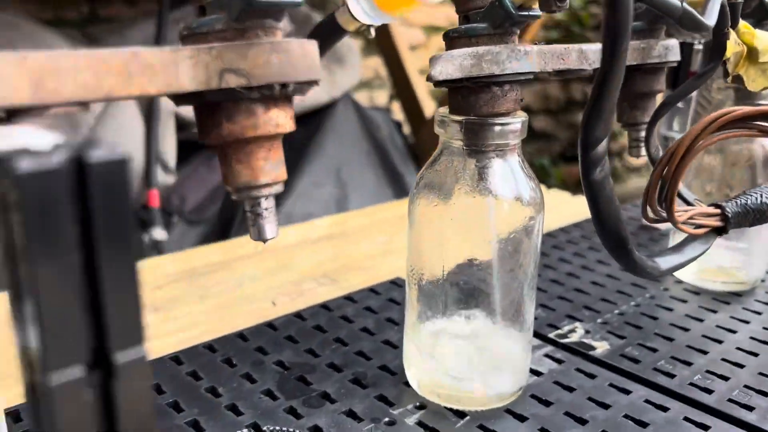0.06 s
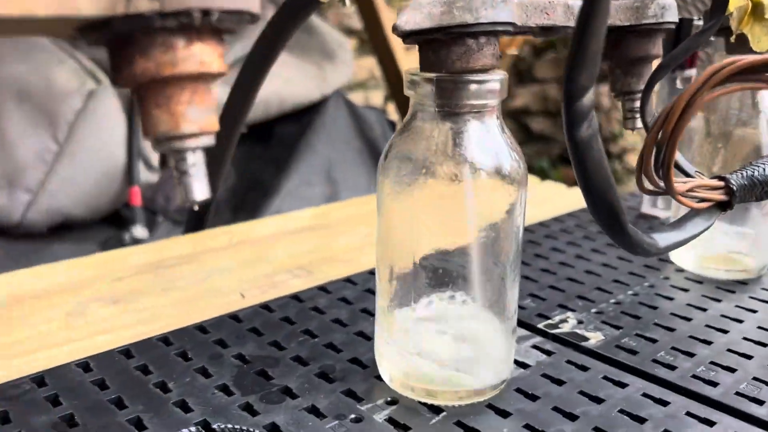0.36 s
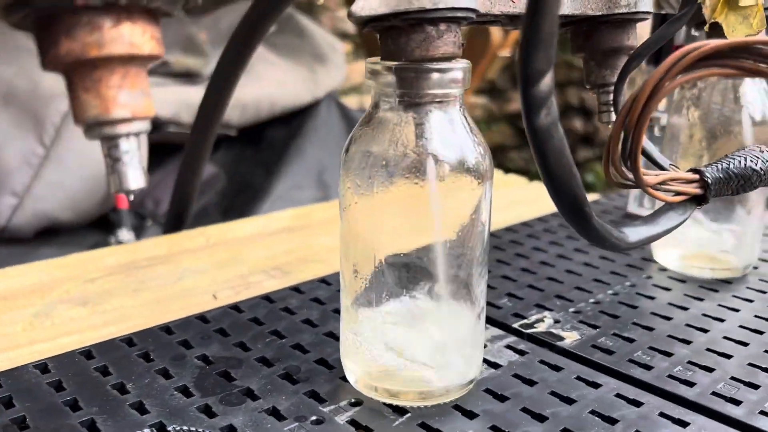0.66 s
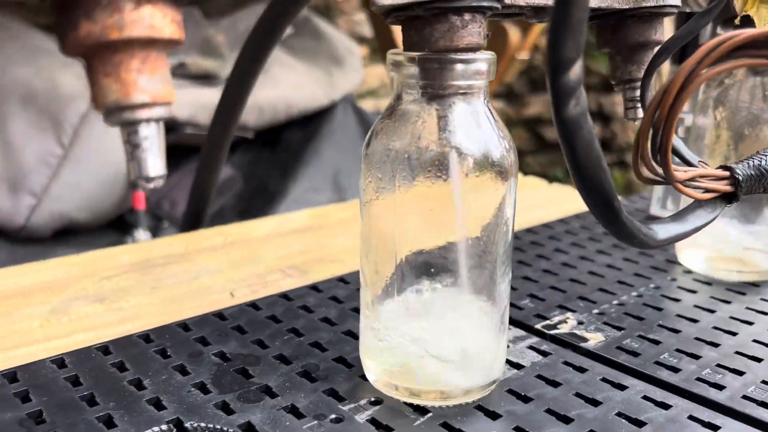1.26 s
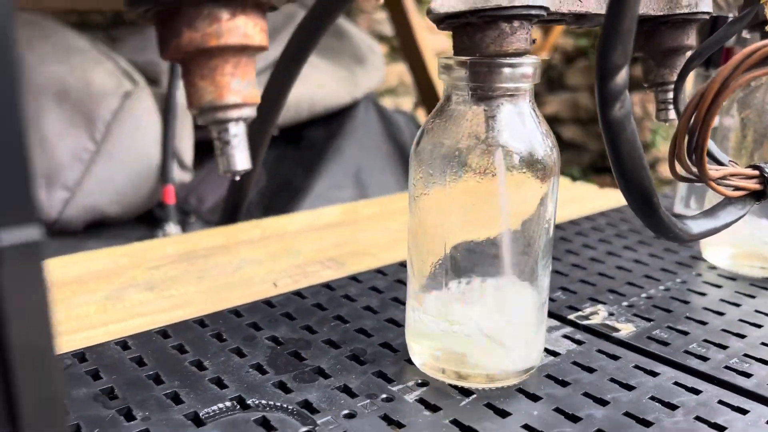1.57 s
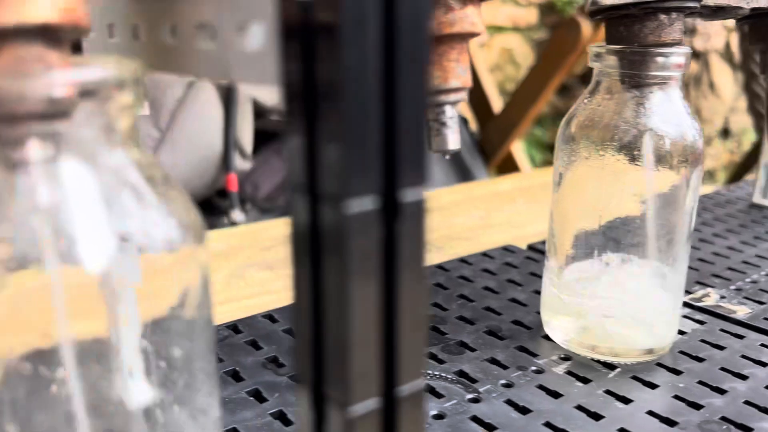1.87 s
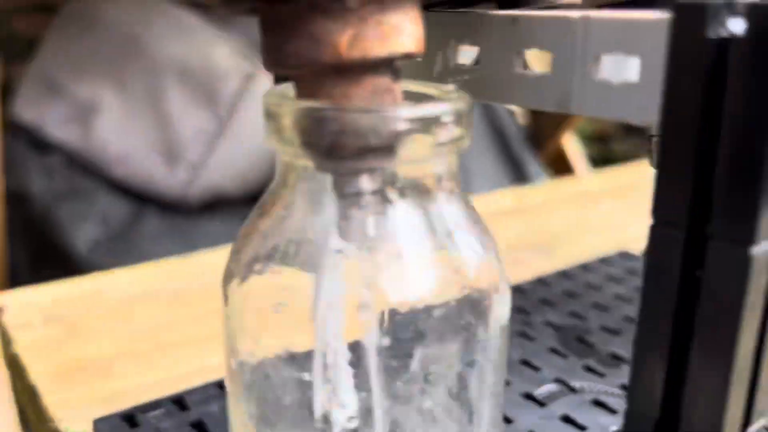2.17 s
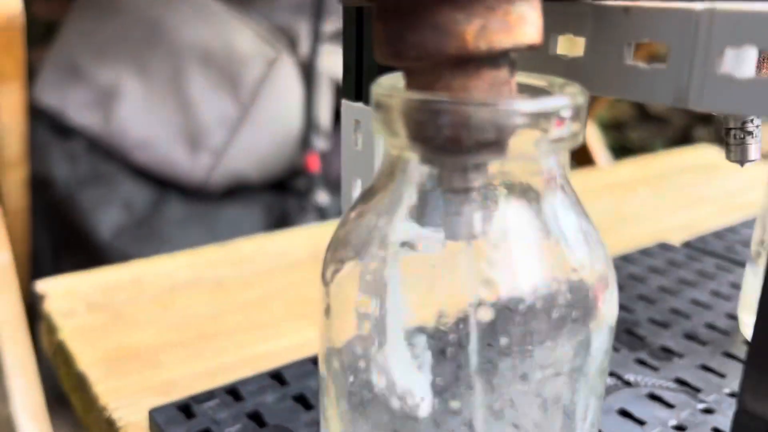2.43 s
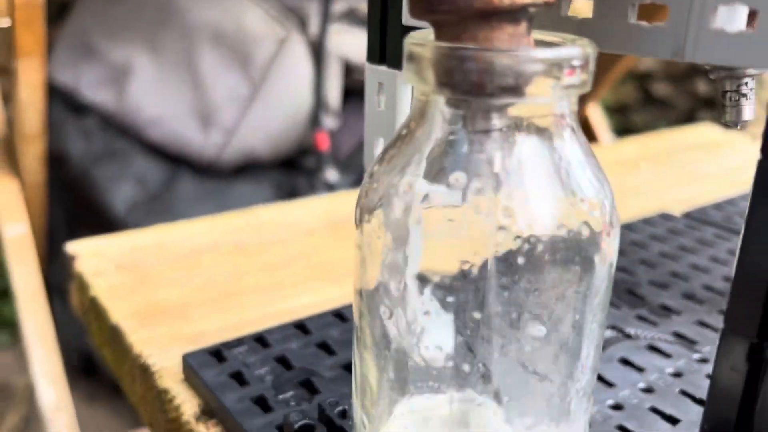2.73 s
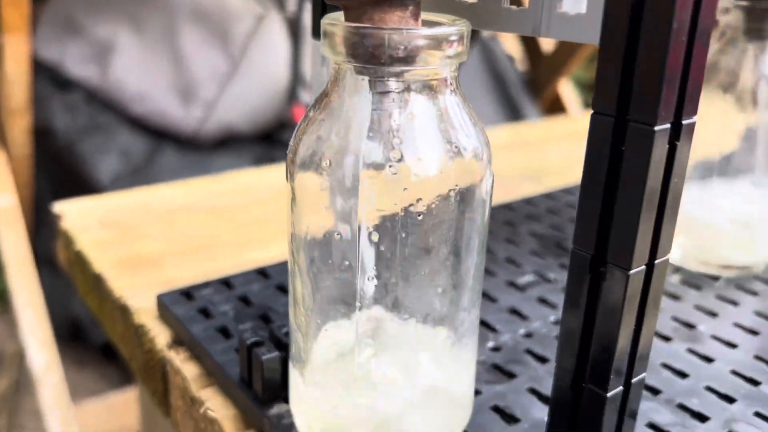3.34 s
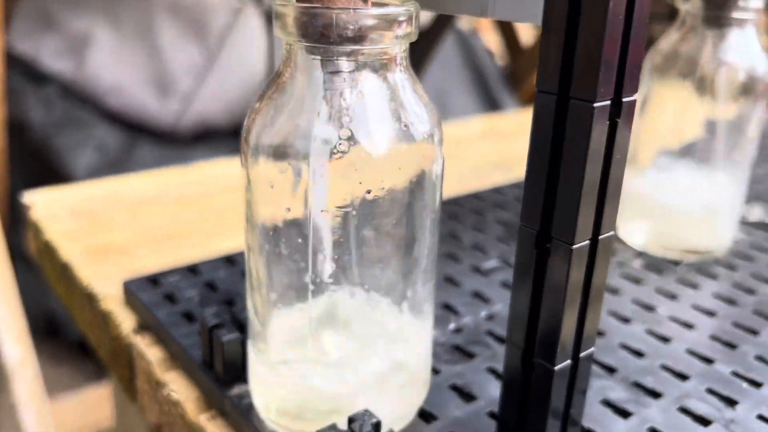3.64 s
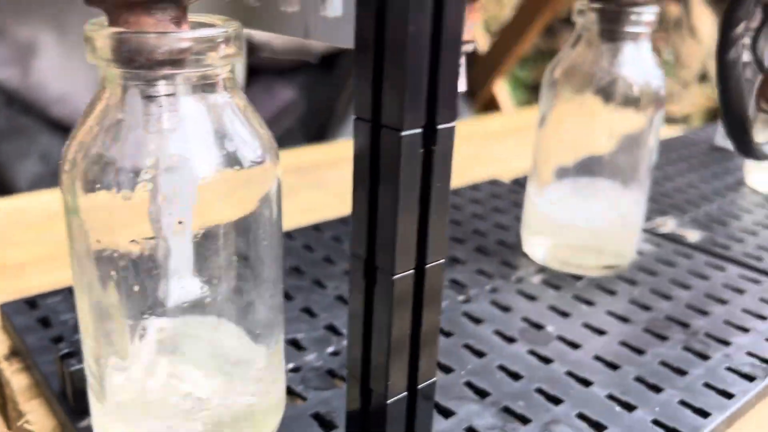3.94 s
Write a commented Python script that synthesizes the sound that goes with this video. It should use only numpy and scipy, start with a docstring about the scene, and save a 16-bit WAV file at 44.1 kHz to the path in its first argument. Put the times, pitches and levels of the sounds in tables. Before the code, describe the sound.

A fast ticking buzz of fuel injectors spraying into glass bottles cuts off suddenly.

```python
"""At an outdoor test bench, fuel injectors pulsed a hundred times a second spray into glass bottles.
In every cycle the valves click open and shut, their impacts drive the frame into a harmonic buzz,
and the fuel hisses; now and then the pump catches with a clank. The microphone moves from one bottle
to the next, where drops set the glass ringing. After a soft bump the drive is switched off,
leaving quiet air and a little wind."""
import sys
import numpy as np
from scipy import signal
from scipy.fft import rfft, irfft, next_fast_len
from scipy.io import wavfile
from scipy.ndimage import map_coordinates

SR = 44100
rng = np.random.default_rng(int(sys.argv[2]) if len(sys.argv) > 2 else 0)


def digitize_waveform(pressure):
    """Quantize a signal to 16-bit integers and store it at the path in sys.argv[1].

    Rows of a 2-D input are taken as channels; values are limited to [-1, 1].
    """
    field = np.atleast_2d(pressure).T
    bounded = np.clip(field, -1, 1)
    quanta = np.round(bounded * 32767).astype(np.int16)
    wavfile.write(sys.argv[1], SR, quanta)


N = 176400
T = np.arange(N) / SR
PULSE_HZ, OFF_S = 99.9, 3.868
PERIOD_MS = 1000 / PULSE_HZ

# Valve contacts. Each row: time into the cycle in ms, relative push on the frame in dB,
# relative tick level in dB, decay time constant in ms.
CONTACTS = [(9.5, -15, -2, 0.81), (0.898, -1.5, -12, 0.88), (3.3, -1, -6, 0.84), (4.1, -0.5, -2.5, 0.92)]

def valve_ticks(jitter_s=6e-6, spread_db=0.5, ring_samples=256):
    """Impact excitation: each contact rings briefly, its timbre changing as the microphone drifts."""
    cycle_starts = np.arange(int(N / SR * PULSE_HZ)) / PULSE_HZ
    out = 0
    for at_ms, _, tick_db, decay_ms in CONTACTS:
        times = cycle_starts + at_ms / 1000 + jitter_s * rng.standard_normal(len(cycle_starts))
        strengths = from_db(tick_db + spread_db * rng.standard_normal(len(times)))
        hits = clicks(times, strengths * (times < OFF_S))
        decay = np.exp(-T[:ring_samples] * 1000 / decay_ms)
        responses = rng.standard_normal((2, ring_samples)) * decay
        one, other = (signal.oaconvolve(hits, response)[:N] for response in responses)
        blend_rad = 1.17 * T + 0.23 * drift(2.476)
        out = out + np.cos(blend_rad) * one + np.sin(blend_rad) * other
    return out


def puffs(strengths_db, decay_scale, leak_db, spread_db=0):
    """Incoherent sources add in power: a decaying burst of noise at each contact, over a steady leak."""
    power = from_db(leak_db) ** 2
    for db, (at_ms, _, _, decay_ms) in zip(strengths_db, CONTACTS):
        since_ms = (T * 1000 - at_ms) % PERIOD_MS
        power = power + (from_db(db) * np.exp(-since_ms / (decay_ms * decay_scale))) ** 2
    noise = rng.standard_normal(N) * np.sqrt(power) * running()
    cycle = (T * PULSE_HZ).astype(int)
    cycle_gains = from_db(spread_db * np.clip(rng.standard_normal(cycle[-1] + 1), -2, 2))
    return noise * rms_one(cycle_gains[cycle])


# The rig's loudness at the microphone. Each row: time in seconds, then the relative levels in dB
# of the frame's hum, the frame's rasp and the treble of ticks and spray.
RIG_LEVELS = [(0.0, -43, -28, -29), (0.02, -41, -32, -29.5), (0.2, -42, -32, -29),
              (0.225, -42.5, -28, -30.5), (0.29, -42.5, -26.5, -30.5), (0.33, -41, -29.5, -29.5),
              (0.55, -41.5, -30, -28), (0.68, -40.5, -26.5, -29), (0.9, -40.5, -29, -29),
              (1.35, -41, -29.5, -28.5), (1.7, -41, -32.5, -29), (1.86, -41.5, -29, -29.5),
              (2.28, -43.5, -33.5, -30.5), (3.01, -43, -36.5, -33), (3.11, -43.5, -36, -33),
              (3.68, -43, -37.5, -34), (3.7, -44, -36.5, -33.5)]
# Ticks and spray beside each bottle. Each row: frequency in Hz, relative spectral density in dB.
TREBLE_FIRST = [(3240, -19), (4500, -13.5), (5400, -6.5), (6080, -8.5), (6640, -5), (7090, -4.5),
                (7450, -3), (8060, -5.5), (8610, -8), (9600, -9.5), (10100, -12), (11300, -10.5),
                (12500, -6.5), (13500, -6), (14500, -3.5), (15700, -3.5)]
TREBLE_SECOND = [(3240, -15.5), (5500, -11), (6300, -7), (6940, 0), (7540, -8), (7990, -1), (9480, -8),
                 (11000, -5.5), (11800, -9.5), (13300, -7), (14100, -10), (14500, -1), (15700, -9)]

def ticks_and_spray():
    """Source and filter: valve ticks and fuel hiss take their colour from the microphone's position."""
    ticks = rms_one(valve_ticks())
    spray = rms_one(puffs([tick_db for _, _, tick_db, _ in CONTACTS], decay_scale=1.2, leak_db=-10))
    source = with_bench_echo(from_db(-2.5) * ticks + from_db(-4) * spray)
    _, _, treble_db = in_time(RIG_LEVELS)
    second = second_bottle_share()
    treble = (1 - second) * colour(source, TREBLE_FIRST) + second * colour(source, TREBLE_SECOND)
    return from_db(treble_db - 1) * treble + sheen(source) + (1 - second) * nozzle_ring(source)


# The bench reflection as the microphone moves. Each row: time in seconds, delay in ms.
BENCH_ECHO = [(0, 0.8), (.4, 0.79), (1.0, 0.69), (1.55, 0.62), (1.9, 0.78), (2.15, 1.024), (2.7, 1.14),
              (4, 1.2)]

def with_bench_echo(direct, echo_db=-12.5):
    """Comb filtering: a reflection with a changing delay interferes with the direct sound."""
    delay_s = in_time(BENCH_ECHO)[0] / 1000
    return direct + from_db(echo_db) * map_coordinates(direct, [(T - delay_s) * SR], order=3)


# A bright resonance. Each row: time in seconds, centre frequency in Hz, level in dB.
SHEEN = [(0, 9200, -44), (.4, 8600, -45.5), (.9, 9000, -42.5), (1.6, 8600, -40.5), (1.7, 8650, -44),
         (1.82, 8040, -37.5), (2.02, 7630, -39.5), (2.2, 7430, -46), (3.84, 7000, -41)]

def sheen(source, pole_width_hz=800):
    """Band-pass resonance: a bright peak sinks in frequency as the microphone passes."""
    hz, db = in_time(SHEEN)
    carrier = np.exp(2j * np.pi * np.cumsum(hz) / SR)
    radius = np.exp(-np.pi * pole_width_hz / SR)
    baseband = signal.lfilter([1], [1, -2 * radius, radius ** 2], source / carrier)
    return from_db(db) * rms_one((baseband * carrier).real)


# A metal part by the first bottle. Each row: frequency in Hz, level in dB, 60 dB decay time in seconds.
NOZZLE_MODES = [(5390, -44, 0.023)]

def nozzle_ring(source):
    """Forced resonance: the ticks and spray keep one metal part ringing."""
    return sum(from_db(db) * rms_one(ring(source, [(hz, 0, t60)])) for hz, db, t60 in NOZZLE_MODES)


# The frame's spectrum beside each bottle. Each row: harmonic number, relative level in its band in dB.
FRAME_FIRST = [(1, -23.5), (2, -10.5), (3, -11), (4, -17.0), (5, -3.5), (6, -5.5), (7, -13.5), (8, -20.5),
               (9, -13), (10, -3), (11, -7), (12, -4.5), (13, 0.5), (14, 2), (15, 2), (16, -19.5), (17, 2),
               (18, 3), (19, -2), (20, -7), (21, -4.5), (22, -3), (23, -4), (24, -2), (25, -17.5),
               (26, -8.5), (27, -7.5), (28, -4.5), (29, 1.5), (30, -7), (31, -7), (32, -5.5), (33, -7.0),
               (34, -6), (35, -2.5), (36, -2), (37, -11.5), (38, -0.5), (39, -6.5), (40, -10), (41, 1),
               (42, -3.5), (43, -4.5), (44, -11.5), (45, -4.5), (46, -6), (47, -7), (48, -9.5), (49, -10),
               (50, -6.5), (51, -9), (52, -3), (53, -9.5), (54, 2), (55, -13.5)]
FRAME_SECOND = [(1, -22), (2, -12.5), (3, -8.5), (4, -15.5), (5, -7.5), (6, -15), (7, -11), (8, -25),
                (9, -12.5), (10, -2.5), (11, -8), (12, -6), (13, -4), (14, -4), (15, 2), (16, -24),
                (17, -7), (18, -7), (19, -9), (20, -10), (21, -11.5), (22, -2.5), (23, -5.5), (24, -3.5),
                (25, -8.5), (26, -17.5), (27, -8.5), (28, -11.5), (29, -10.0), (30, -13), (31, -5.5),
                (32, -11), (33, -14), (34, -7.5), (35, -11.0), (36, -6.5), (37, -13.5), (38, -6.5),
                (39, -6.5), (40, -12), (41, -5), (42, -11.0), (43, -5.5), (44, -13.5), (45, -20),
                (46, -9.5), (47, -19), (48, -8), (49, -7), (50, -11.5), (51, -20), (52, -4.5), (53, -8),
                (54, -11), (55, -10.5)]
# The buzz band, between hum and rasp. Each row: time in seconds, relative level in dB.
BUZZ_LEVEL = [(0.0, -32.5), (0.21, -31.5), (0.22, -30), (0.32, -32), (1.45, -30.5), (1.49, -33),
              (1.57, -31), (1.71, -31.5), (1.79, -32.5), (2.05, -32.5), (2.45, -35), (2.46, -37.5),
              (2.57, -34.5), (2.93, -35), (2.95, -37), (3.25, -34), (3.41, -35.5), (3.84, -34)]
# Harmonics that meet a resonance, by harmonic number. Each row: time in seconds, relative level in dB.
RESONANT_HARMONICS = { 12: [(0, -47), (1.0, -44.5), (2.4, -45), (2.55, -48), (2.68, -40.5), (2.95, -45),
                      (3.85, -44.5)], 13: [(0, -43.5), (.45, -39.5), (1.0, -38.5), (1.7, -42.5), (1.8, -47),
                      (2.4, -47.5), (2.75, -43), (3.3, -48)], 14: [(0.02, -42.5), (0.1, -36.5),
                      (0.14, -61.0), (0.23, -44.5), (0.28, -55.0), (0.53, -48), (0.76, -39), (0.79, -58.5),
                      (0.86, -41), (1.44, -40.5), (1.7, -42), (1.74, -50.0), (1.97, -46), (2.48, -66),
                      (2.93, -47), (2.96, -58), (3.08, -51.5), (3.85, -47)], 15: [(0.02, -40), (0.2, -51.5),
                      (0.23, -41.0), (0.47, -67), (0.8, -46.0), (0.85, -59.5), (1.08, -39), (1.11, -52),
                      (1.17, -44), (1.3, -41), (1.46, -38.0), (1.49, -63), (1.52, -45), (1.69, -36.0),
                      (1.78, -61.0), (1.88, -38), (1.93, -48.5), (2.0, -40.5), (2.42, -40), (2.49, -57),
                      (2.53, -38), (2.57, -57), (2.79, -41), (2.81, -56.5), (2.92, -41), (3.02, -51),
                      (3.17, -39), (3.46, -40.5), (3.54, -45.0), (3.57, -39.5), (3.77, -38), (3.85, -46.5)],
                      17: [(0.02, -47), (0.25, -46), (0.29, -45), (0.9, -42), (1.35, -49), (1.51, -46),
                      (1.7, -55.5), (1.78, -46), (2.06, -62), (2.66, -49.5), (3.23, -52), (3.85, -53)],
                      18: [(0.02, -39), (0.19, -49), (0.23, -33), (0.3, -50), (0.55, -42), (0.59, -50.5),
                      (0.73, -36), (0.82, -52), (0.88, -40), (1.45, -40.5), (1.69, -43), (1.74, -52),
                      (2.11, -48), (2.53, -63), (2.92, -48.5), (2.97, -58), (3.28, -48), (3.85, -55)],
                      29: [(0.02, -46.5), (0.24, -41), (0.53, -42), (0.73, -41), (0.83, -43.0), (1.26, -47),
                      (1.34, -52), (1.52, -42), (1.97, -52), (2.5, -50), (2.6, -51), (3.85, -49.5)],
                      35: [(0.02, -49), (0.35, -39.5), (0.83, -45.5), (1.14, -56.5), (1.49, -43),
                      (1.53, -54), (1.74, -44), (2.08, -45.5), (2.58, -51.5), (3.1, -64), (3.2, -62),
                      (3.85, -72)], 42: [(0.02, -55), (1.64, -41.5), (1.71, -53), (1.76, -44), (2.16, -51),
                      (2.22, -44.5), (2.4, -63), (2.46, -51), (2.96, -59.0), (3.09, -52.5), (3.27, -57.5),
                      (3.85, -59)], 54: [(0.02, -49), (0.34, -47), (0.93, -41), (1.46, -41.5), (1.54, -45),
                      (1.91, -41.5), (1.97, -63), (2.14, -52), (2.58, -73), (2.72, -48), (3.04, -56),
                      (3.85, -47.5)], }
# How strongly a catch of the pump shifts the frame's harmonics: a factor each for hum, buzz and rasp.
CATCH_REACH = [0.42, 0.94, 0.44]

def frame_buzz(wander_depth=0.12, flutter_depth=0.27, jump_depth=0.22, jump_rad=0.55, steps=800):
    """Periodic forcing: harmonics of the pulse rate wander, flutter and shift at every catch."""
    orders = np.array(FRAME_FIRST)[:, 0].round()
    bands = np.searchsorted([8.5, 25.5], orders)   # hum, buzz, rasp
    spectra = [from_db(np.array(table)[:, 1]) for table in (FRAME_FIRST, FRAME_SECOND)]
    first, second = (g / np.sqrt(np.bincount(bands, g ** 2))[bands] for g in spectra)   # unit band power
    hum_db, rasp_db, _ = in_time(RIG_LEVELS)
    buzz_db, = in_time(BUZZ_LEVEL)
    band_gains = from_db([hum_db - 0.9, buzz_db - 0.4, rasp_db - 1.82])
    share = second_bottle_share()
    step_times = np.linspace(0, N / SR, steps)
    catches_so_far = np.searchsorted([start for start, _ in CATCHES], step_times)
    fundamental = np.exp(2j * np.pi * PULSE_HZ * T)
    harmonic, out = 1, 0
    for k, band, gain_1, gain_2, phase in zip(orders, bands, first, second, harmonic_phases(orders)):
        harmonic = harmonic * fundamental
        height = k / orders[-1]
        # Real parts modulate the log amplitude, imaginary parts the phase.
        jumps = rng.standard_normal((len(CATCHES) + 1, 2)) @ [jump_depth, 1j * jump_rad]
        wander = wander_depth * height * (drift(4.3, steps) + 2j * drift(2.03, steps))
        flutter = flutter_depth * np.sqrt(height) * (drift(60, steps) + 1j * drift(60, steps))
        modulation = CATCH_REACH[band] * jumps[catches_so_far] + wander + flutter
        gain = band_gains[band] * (gain_1 + (gain_2 - gain_1) * share)
        if k in RESONANT_HARMONICS:
            gain = from_db(in_time(RESONANT_HARMONICS[k])[0] + 1.8)
            modulation = 1j * modulation.imag
        sway = np.interp(T, step_times, np.exp(modulation + 1j * phase))
        out = out + np.sqrt(2) * gain * (sway * harmonic).real
    return out * running()


def harmonic_phases(orders, decay_ms=0.94, hum_lag_ms=2.814, hum_scatter_rad=0.8, size=441):
    """Constructive interference: high harmonics bunch at the contacts, low ones swell once a cycle."""
    cycle_ms = np.arange(size) / size * PERIOD_MS
    envelope = sum(from_db(push_db) * np.exp(-((cycle_ms - at_ms) % PERIOD_MS) / decay_ms)
                   for at_ms, push_db, _, _ in CONTACTS)
    high = np.angle(rfft(envelope * rng.choice([-1, 1], size)))[orders.astype(int)]
    low = hum_scatter_rad * rng.standard_normal(len(orders)) - 2 * np.pi * orders * hum_lag_ms / PERIOD_MS
    return np.where(orders < 9, low, high)


# Loose rattle and splash. Each row: frequency in Hz, relative spectral density in dB.
RATTLE_SPECTRUM = [(120, -14), (165, -7), (250, -13.5), (430, 1.5), (600, -10), (850, -9.5), (1100, -3.5),
                   (1250, -7), (1420, 2.5), (1650, -4), (1850, -4), (2300, 2), (2750, -3.5), (4200, 0),
                   (5300, -3), (6000, 0), (8000, -29)]
# The rattle's strength. Each row: time in seconds, relative level in dB.
RATTLE_LEVEL = [(0, -35.5), (.25, -36), (.5, -38.5), (1.1, -37), (1.6, -34), (2.1, -38), (2.6, -37),
                (3.2, -37), (3.84, -33)]

def rattle():
    """Aperiodic excitation: the part of each blow that differs between cycles sputters as noise."""
    pushes_db = [push_db for _, push_db, _, _ in CONTACTS]
    blows = puffs(pushes_db, decay_scale=0.95, leak_db=-14, spread_db=3.5)
    return from_db(in_time(RATTLE_LEVEL)[0] - 3) * colour(blows, RATTLE_SPECTRUM)


# Hard blows as the pump catches. Each row: start in seconds, relative level in dB.
CATCHES = [(.131, -28), (0.221, -28), (.571, -33), (0.782, -27), (1.012, -27), (1.102, -35), (1.189, -28),
           (1.253, -26), (1.431, -34), (1.472, -30), (1.553, -28), (1.613, -28), (1.733, -25), (1.911, -28),
           (2.024, -35), (2.133, -35), (2.244, -29), (2.283, -38), (2.451, -30), (2.558, -30), (2.593, -29),
           (2.804, -29), (2.945, -37), (3.283, -31), (3.385, -40), (3.474, -35), (3.526, -32), (3.606, -39),
           (3.653, -41), (3.725, -35), (3.796, -38), (3.841, -33)]
# The clank of a catch. Each row: frequency in Hz, relative spectral density in dB.
CATCH_SPECTRUM = [(400, -11), (850, -13), (1050, -7), (1250, -5), (1430, -1), (1650, -10), (1850, -1),
                  (2300, 0), (2750, -8), (4200, -2), (5400, -12)]

def pump_catches(decay_s=0.0098):
    """Transient response: each hard blow clanks through the frame and decays exponentially."""
    envelope = sum(from_db(db - 1) * (T >= start) * np.exp(-abs(T - start) / decay_s)
                   for start, db in CATCHES)
    return envelope * colour(rng.standard_normal(N), CATCH_SPECTRUM)


# A thin, high whistle. Each row: time in seconds, level in dB.
WHISTLE_LEVEL = [(0, -43), (.7, -64), (1.05, -63), (1.35, -45), (1.6, -50), (2.0, -52), (2.3, -60)]

def whistle(order=77):
    """Phase modulation: one high harmonic wavers slightly, loudest beside the first bottle."""
    phase = 2 * np.pi * order * PULSE_HZ * T + 0.4 * drift(10)
    return np.sqrt(2) * from_db(in_time(WHISTLE_LEVEL)[0]) * np.sin(phase) * running()


# Large drops on the glass. Each row: start in seconds, relative level in dB, pitch in Hz.
DROPS = [(2.225, -29, 5700), (2.894, -29, 5800), (3.026, -42, 5800), (3.477, -27, 5800), (3.825, -37, 5900)]
# Modes of the glass. Each row: multiple of the pitch, gain in dB, 60 dB decay time in seconds.
GLASS_MODES = [(1, 4, 0.046), (1.56, 1, 0.018)]
# Small drops on the glass. Each entry: pitch in Hz.
DRIZZLE_HZ = [5400, 5930, 6060, 5950, 5800]

def drops(drizzle_per_s=180, drizzle_from_s=1.9):
    """Modal ringing: a few large drops and a random drizzle strike the second bottle."""
    def glass(hits, hz):
        return ring(hits, [(hz * multiple, db, t60) for multiple, db, t60 in GLASS_MODES])
    out = sum(glass(clicks(np.array([start]), from_db([db])), hz) for start, db, hz in DROPS)
    drizzling = (T > drizzle_from_s) & (T < OFF_S)
    for hz in DRIZZLE_HZ:
        lands = (rng.random(N) < drizzle_per_s / len(DRIZZLE_HZ) / SR) & drizzling
        out = out + glass(lands * from_db(-45.5) * rng.standard_normal(N), hz)
    return out


# Modes of a hollow knock. Each row: frequency in Hz, gain in dB, 60 dB decay time in seconds.
BUMP_MODES = [(164, -4, 0.1), (207, -2, .07), (326, -0.5, 0.065)]

def bump(start_s=3.745, strike_db=-28.5, low_cut_hz=131):
    """Free vibration: one soft impulse excites low, quickly damped modes."""
    knock = ring(clicks(np.array([start_s]), from_db([strike_db])), BUMP_MODES)
    return signal.sosfilt(signal.butter(3, low_cut_hz, "high", fs=SR, output="sos"), knock)


def reflections(direct, level_db=-20.5, t60_s=0.18, cutoff_hz=3500):
    """Diffuse reflection: the bench and the things around it return a short, dull tail."""
    t = T[:SR // 3]
    tail = signal.sosfilt(signal.butter(1, cutoff_hz, fs=SR, output="sos"), rng.standard_normal(len(t)))
    tail = tail * np.exp(-np.log(1000) * t / t60_s)
    return from_db(level_db) * signal.fftconvolve(direct, tail / np.sqrt(np.sum(tail ** 2)))[:N]


# Outdoor air and wind rumble. Each row: frequency in Hz, relative spectral density in dB.
AIR_SPECTRUM = [(60, -16), (110, -11), (160, -2.5), (350, -6.5), (700, -10), (1200, -14), (2500, -28),
                (6000, -28), (15000, -35)]
WIND_SPECTRUM = [(40, -29), (46, -8), (54, -5), (70, -2.5), (110, -21), (250, -18)]
# Gusts. Each row: time in seconds, level in dB.
WIND_LEVEL = [(0, -60.5), (1.25, -60), (1.4, -55.5), (1.7, -53.5), (2.1, -56), (2.4, -54), (2.7, -56),
              (3.25, -62), (3.42, -47), (3.65, -59), (4, -53)]

def air_and_wind(air_db=-53.5):
    """Ambient noise: steady outdoor air and a low rumble of wind on the microphone."""
    air, wind = rng.standard_normal((2, N))
    gusts = from_db(in_time(WIND_LEVEL)[0])
    return from_db(air_db) * colour(air, AIR_SPECTRUM) + gusts * colour(wind, WIND_SPECTRUM)


def second_bottle_share(middle_s=1.82, move_s=0.42):
    """Linear crossfade: 0 with the microphone beside the first bottle, 1 beside the second."""
    return np.clip(0.5 + (T - middle_s) / move_s, 0, 1)


def running(decay_s=0.006):
    """Damping: 1 while the drive is on, then a quick exponential decay."""
    return np.exp(-np.maximum(T - OFF_S, 0) / decay_s)


def ring(force, modes):
    """Modal superposition: each mode responds as a damped sinusoid."""
    out = 0
    for hz, db, t60 in modes:
        radius, angle = np.exp(-np.log(1000) / (t60 * SR)), 2 * np.pi * hz / SR
        feedback = [1, -2 * radius * np.cos(angle), radius ** 2]
        out = out + from_db(db) * signal.lfilter([0, np.sin(angle)], feedback, force + 1e-18)
    return out


def clicks(times_s, gains):
    """Fractional delay: each impulse is shared between two neighbouring samples."""
    out, at = np.zeros(N), np.clip(times_s * SR, 0, N - 2)
    np.add.at(out, at.astype(int), gains * (1 - at % 1))
    np.add.at(out, at.astype(int) + 1, gains * (at % 1))
    return out


def colour(x, spectrum):
    """Spectral shaping: filter to an outline that falls 60 dB an octave past its ends; rms 1."""
    hz, db = np.transpose(spectrum)
    size = next_fast_len(N + SR // 4)
    octave = np.log2(np.maximum(np.arange(size // 2 + 1) * SR / size, 1))
    outside = abs(octave - np.clip(octave, np.log2(hz[0]), np.log2(hz[-1])))
    response = from_db(np.interp(octave, np.log2(hz), db) - 60 * outside)
    return rms_one(irfft(rfft(x, size) * response, size)[:N])


def drift(knots_per_s, size=N):
    """Random modulation: a curve of spread near 1 that spans the scene in `size` steps."""
    knots = rng.standard_normal(2000)
    return 1.2 * np.interp(np.linspace(0, N / SR, size) * knots_per_s, np.arange(len(knots)), knots)


def in_time(rows):
    """Linear interpolation: each column after the time, at every sample."""
    times, *columns = np.transpose(rows)
    return [np.interp(T, times, column) for column in columns]


def from_db(db):
    return 10 ** (np.asarray(db) / 20)


def rms_one(x):
    return x / np.sqrt(np.mean(x ** 2) + 1e-20)


def scene():
    """Superposition: the rig, its reflections and the outdoor air add at one microphone."""
    rig = frame_buzz() + ticks_and_spray() + whistle() + rattle() + pump_catches() + drops() + bump()
    return (rig + reflections(rig) + air_and_wind())[None]


def record(dry, cutoff_hz=15730):
    """Band limiting: a steep low-pass filter removes the highest treble."""
    return signal.sosfilt(signal.ellip(12, 0.1, 80, cutoff_hz, fs=SR, output="sos"), dry)


dry = scene()
out = record(dry)
digitize_waveform(out)
```